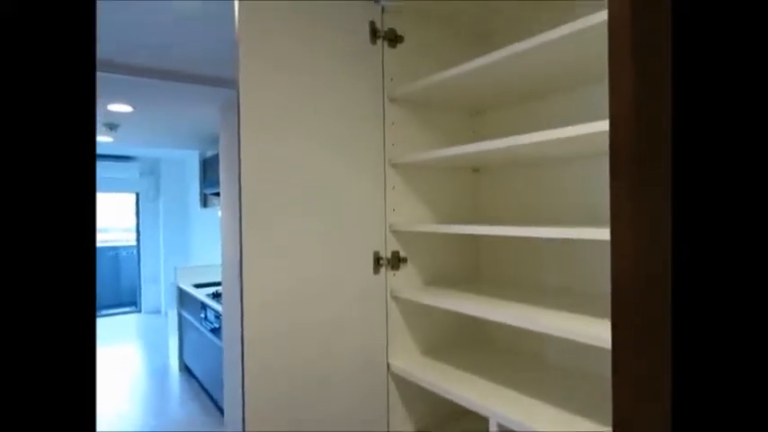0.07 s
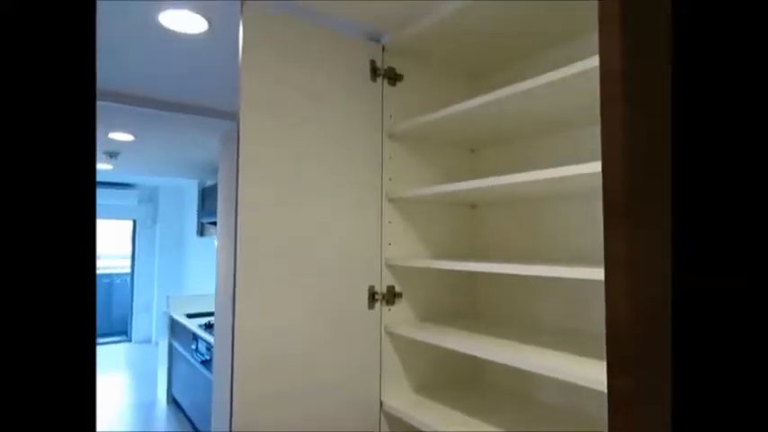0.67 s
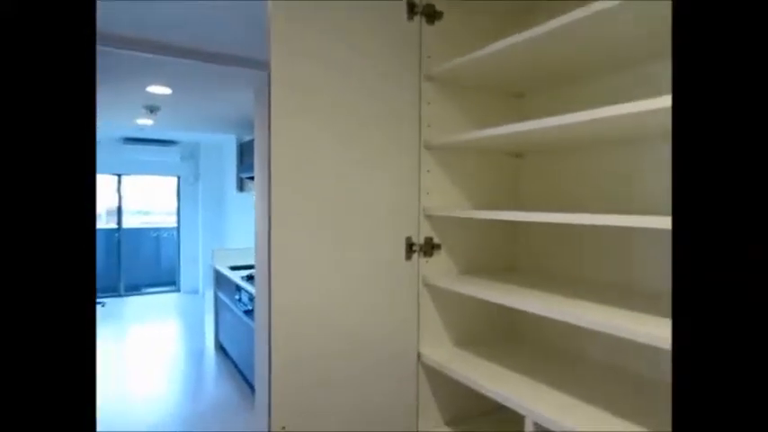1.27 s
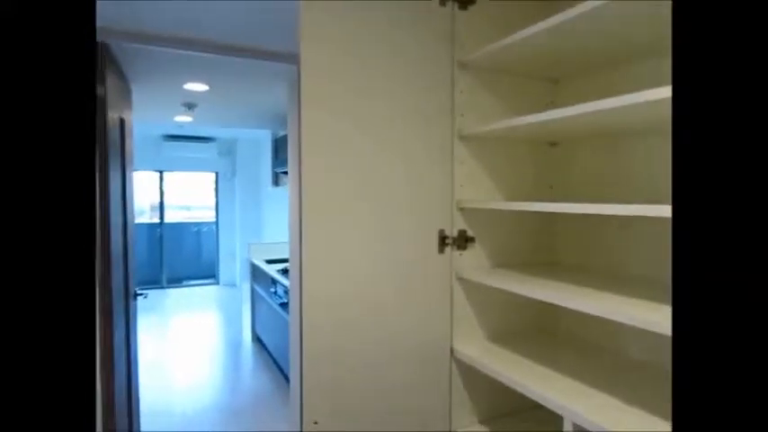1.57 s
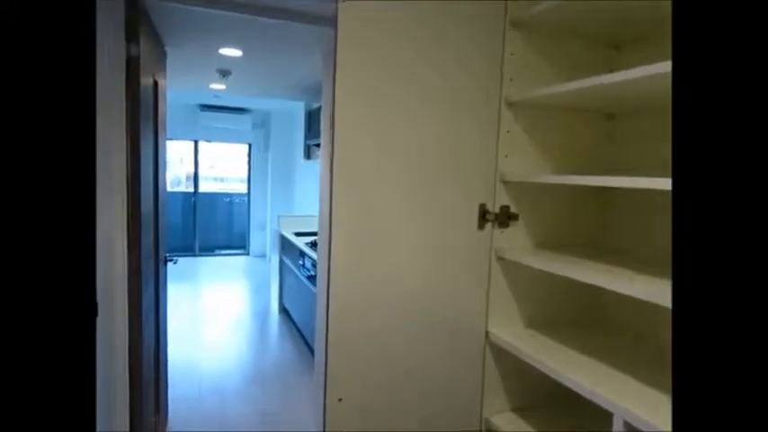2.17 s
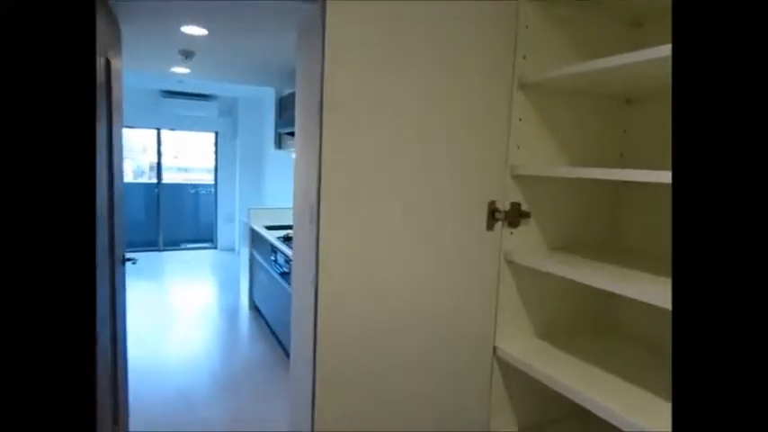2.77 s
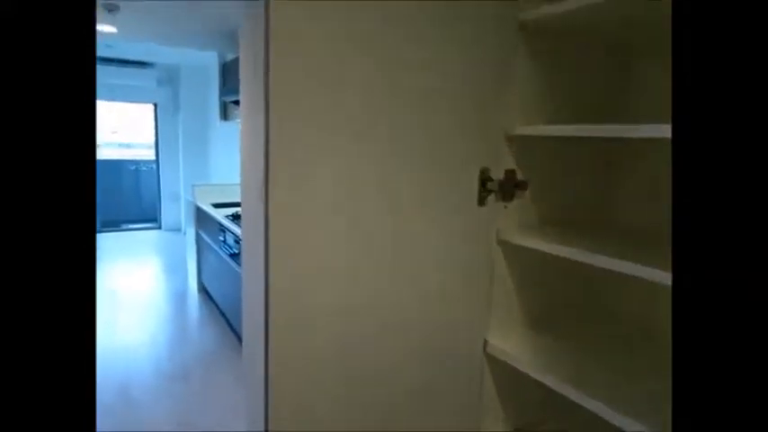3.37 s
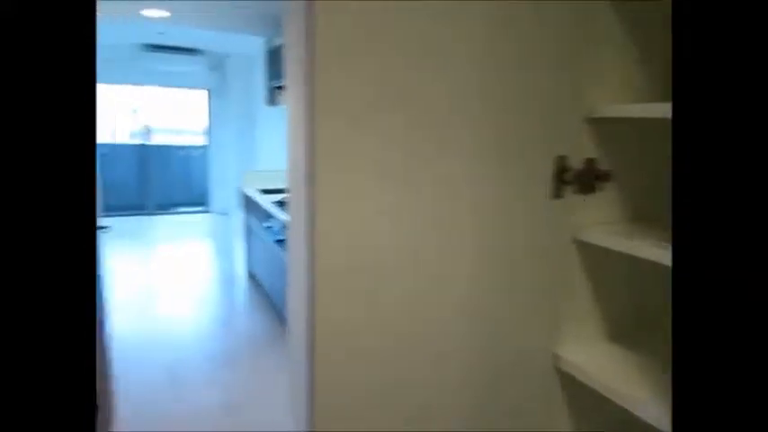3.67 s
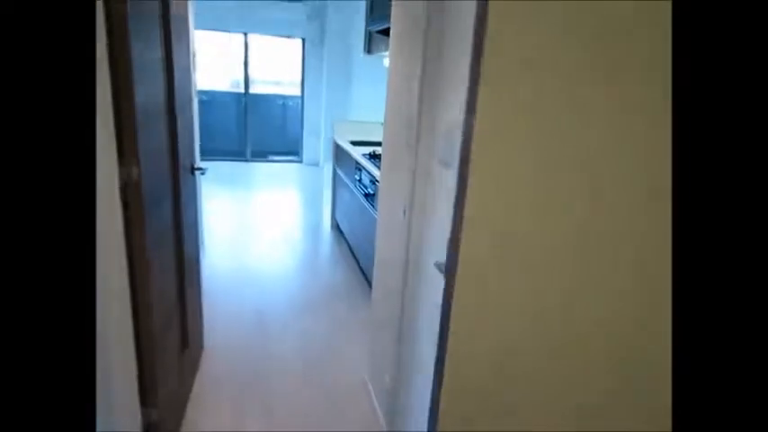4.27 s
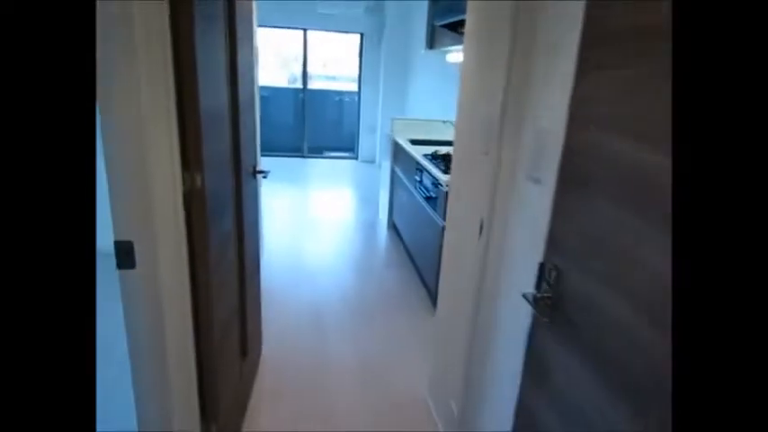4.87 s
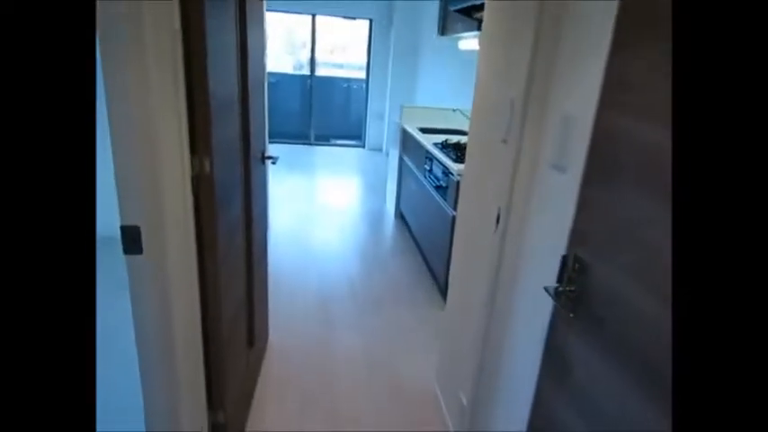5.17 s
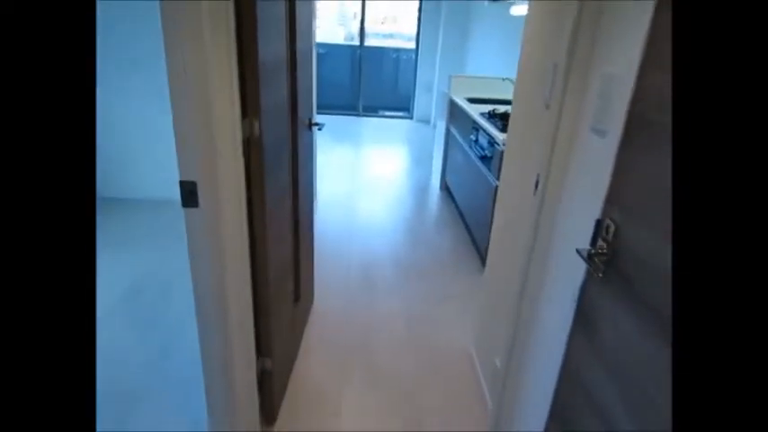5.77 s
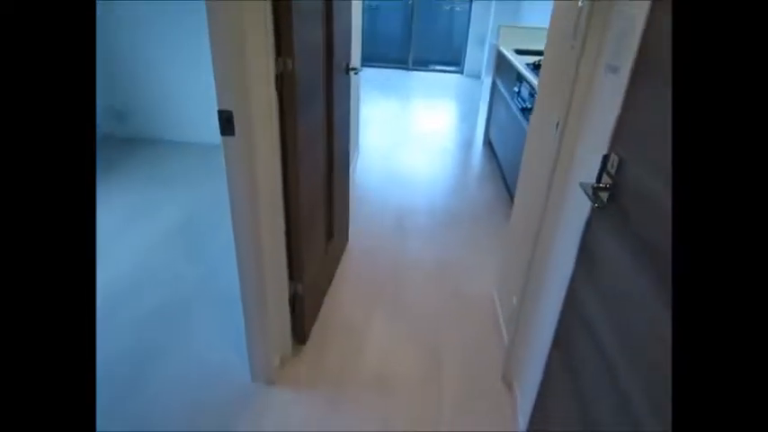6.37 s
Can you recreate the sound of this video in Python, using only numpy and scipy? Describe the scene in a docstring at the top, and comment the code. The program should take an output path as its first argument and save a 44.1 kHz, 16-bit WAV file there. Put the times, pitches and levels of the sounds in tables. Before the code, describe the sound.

Three cabinet doors bang shut close by in a bare room, over soft room noise, an electrical hum and tiny ticks.

```python
"""Built-in cupboard doors, pushed shut three times, close to a hand-held camera in a bare, echoing room.
Each blow thumps, cracks the latch and rings the panel and carcass. The two hard slams overload the
recorder, whose gain control ducks the room and slowly lets it back. Feet shift and fingers tap nearby;
right at the stereo microphones the lens ticks and sleeves rustle. Behind it all lie room tone and a
mains hum that swells and fades as the camera moves through its standing wave."""
import sys
import numpy as np
from scipy import signal
from scipy.fft import rfft, irfft
from scipy.io import wavfile
from scipy.ndimage import uniform_filter1d, minimum_filter1d

SR = 44100
rng = np.random.default_rng(int(sys.argv[2]) if len(sys.argv) > 2 else 0)


def persist_wave(psi):
    """Save psi, clipped to +-1, as 16-bit WAV."""
    counts = np.round(np.clip(psi, -1, 1) * 32767).astype(np.int16)
    wavfile.write(sys.argv[1], SR, np.atleast_2d(counts).T)


N = 292824

# door blows, close by: (time [s], strength [dB], thump pitch [Hz], contact time [s], clatter [dB],
# clatter's high edge [Hz], latch crack [dB])
DOOR_BLOWS = [(2.5531, -10, 756, 0.001, -16.5, 2100, -35), (2.557, -2, 1940, 0.00056, -21.5, 2500, -38),
              (2.5672, -3, 355, 0.0036, -22.5, 2500, -30), (3.153, -18.5, 1950, 0.0026, -33, 2380, -60),
              (4.332, -25.5, 990, 0.0015, -35.5, 2300, -59), (4.6276, -2, 256, 0.00095, 0.5, 2140, -15.5),
              (4.639, 4, 193, 0.0019, -.5, 1200, -22), (4.651, 9, 106.5, 0.0019, -18, 1200, -8),
              (4.755, 0, 76, 0.0099, -14, 1670, -41), (6.5495, 5, 136, 0.00087, -2.5, 1950, -22),
              (6.553, 1, 378, 0.0038, -18.5, 3200, -21), (6.572, 7, 54, .0034, -11, 1300, -23)]
# modes of the door panel: (pitch [Hz], relative level [dB], t60 before the treble cap [s])
PANEL_MODES = [(265, -14, .4), (319.4, 6, 0.36), (362.5, 3, 0.32), (401, -16, 0.19), (479.3, -0.5, 0.29),
               (661, 1, 0.12), (772, -8.5, 0.47), (826, 0, 0.38), (915, -27, 0.099), (1040, -26, 0.13),
               (1285, -30, 0.2), (1512, -6.5, 0.27), (1600, -21, 0.14), (1683, -2.5, 0.12),
               (1856, -9, 0.15), (2012, 3, 0.2), (2200, -19, 0.096), (2400, -37, 0.11), (2530, -26, .12),
               (3000, -27, .11), (3400, -26, .09)]
# modes of the carcass and the air in it: (pitch [Hz], relative level [dB], t60 [s])
CARCASS_MODES = [(55, -20, 0.96), (68.2, -4, 0.5), (86.6, 0.5, 0.17), (121, 1.5, 0.16), (173, -5.5, 0.13),
                 (204.5, -1.5, 0.11), (248, -10, 0.143), (443, -7, 0.061)]
# dense wood resonances: (frequency [Hz], relative density [dB])
WOOD_SPECTRUM = [(40, -7), (200, 4.5), (290, -0.5), (430, 2), (620, -4.5), (950, -4.5), (1400, -7.5),
                 (2200, -6), (3200, -13), (5000, -9), (9000, -6), (16000, 9.5)]
# wood and echo across the microphones: (frequency [Hz], left-right likeness [ratio])
WOOD_LIKENESS = [(60, 1), (400, 0.94), (1200, 0.93), (2500, 0.89), (6000, -0.5), (15000, -1.04)]
# reverberation of the bare room: (frequency [Hz], t60 [s])
ROOM_DECAY = [(50, .8), (150, .8), (400, .85), (850, .92), (1500, .85), (2400, .68), (4000, .5),
              (8000, .34), (16000, .22)]
# soft footfalls nearby: (time [s], level [dB], centre [Hz])
FOOTFALLS = [(2.88, -39, 240), (3.05, -37.5, 141), (4.17, -35.5, 132), (5.92, -30, 70), (5.98, -34.5, 112),
             (6.485, -33.5, 90)]
# light taps on the woodwork: (time [s], level [dB], centre [Hz])
WOOD_TAPS = [(2.039, -40, 1500), (2.89, -42, 340), (4.46, -46, 820), (5.515, -45, 1890)]
# the camera's case in the hand: (time [s], level [dB], centre [Hz])
CASE_CLICKS = [(.298, -28, 580), (.299, -44, 1800), (3.815, -36, 4400)]
# the clearer focus steps of the lens: (time [s], force [dB])
FOCUS_STEPS = [(0.017, -36.5), (.131, -26), (.484, -34), (.531, -27), (.784, -33), (.917, -33.5),
               (1.084, -32), (1.197, -29.5), (1.353, -38), (1.552, -25.5), (2.1, -25), (2.254, -30),
               (3.087, -27), (3.486, -35), (3.553, -38.5), (3.686, -25.5), (3.956, -37.5), (4.054, -31.5),
               (4.198, -34.5), (4.266, -27), (5.654, -38.5), (5.701, -40), (5.77, -27.5), (5.922, -30.5),
               (5.991, -26), (6.056, -30.5), (6.158, -26), (6.423, -34.5)]
# sleeve and grip at the microphones: (middle time [s], length [s], relative level [dB])
SLEEVE_STROKES = [(1.222, 0.027, -43.5), (1.874, 0.034, -46.5), (2.053, 0.028, -46.5), (2.426, 0.029, -47),
                  (3.05, 0.27, -49.5), (3.311, 0.041, -43), (3.804, 0.052, -43.5), (4.216, 0.078, -47.5),
                  (6.28, 0.43, -53.5)]
# brushing cloth: (frequency [Hz], relative density [dB])
CLOTH_SPECTRUM = [(300, -9), (2000, 8), (4500, 4), (8000, -1.5), (13500, 5.5), (16000, -9)]
# mains hum along the camera's path: (time [s], relative level [dB])
HUM_LEVELS = [(0, -38), (.77, -40), (1.23, -35), (1.82, -31.5), (2.23, -23.5), (2.85, -18.5), (3.28, -20.5),
              (3.72, -38), (4.14, -38), (4.55, -33.5), (5.1, -26.5), (5.6, -28), (6.64, -30.5)]
# room tone: (frequency [Hz], relative density [dB])
AIR_SPECTRUM = [(100, 2), (170, 2.5), (205, 2.5), (226, 0), (263, 3), (377, -0.5), (666, -3), (1130, -4.5),
                (1960, -9.5), (3150, -10.5), (3960, -13), (12800, -23), (15800, -27)]
# air, cloth and lens rattle across the microphones: (frequency [Hz], left-right likeness [ratio])
AIR_LIKENESS = [(60, 0.88), (300, -0.55), (1200, 0.18), (3000, 0.51), (7000, 0.22), (15000, -0.18)]
# drift of the room tone's treble: (time [s], gain [dB])
TREBLE_DRIFT = [(0, 1), (.75, 0.4), (1.4, 3), (4.5, 2.5), (5.5, -0.5), (6.1, 2.5)]
# rumble under the room tone: (frequency [Hz], relative density [dB])
RUMBLE_SPECTRUM = [(15, -44), (38, -3), (65, 8), (130, 12), (200, -29), (300, -54)]


def doors(panel_db=-22.5, boom_db=-7, boom_rise_s=0.0067, crack_t60=0.008, crack_hz=5500):
    """Close by, each blow thumps, cracks the latch, clatters, rings the panel and booms in the carcass."""
    near, to_room, t = np.zeros((2, N)), np.zeros((2, N)), np.arange(SR // 2) / SR
    for s, db, thump_hz, contact_s, clatter_db, high_hz, crack_db in DOOR_BLOWS:
        stiffness = thump_hz / 300  # a stiff spot thumps higher and drives the panel more
        panel_gain = amp(db + panel_db + 3.5 * np.log2(stiffness))
        boom_gain = amp(db + boom_db) * bell(thump_hz, centre_hz=122, octaves=0.9)  # the carcass's range
        clatter_t60 = 0.11 * (contact_s / 0.00075) ** 0.59  # a slower contact clatters longer
        # a light touch drives no bass, a padded one no treble
        low_hz = 0.68 * thump_hz
        force = lambda hz: hz ** 2 / (hz ** 2 + low_hz ** 2) / np.hypot(1, (hz / high_hz) ** 2)
        clatter = noise(len(t), lambda hz: amp(read(WOOD_SPECTRUM, hz)) * force(hz), WOOD_LIKENESS)
        clatter *= amp(clatter_db - 60 * t / clatter_t60)
        panel = panel_gain * ring(PANEL_MODES, t, force, spread=0.4, split=0.019) * rise(t, 0.00094)
        boom = boom_gain * ring(CARCASS_MODES, t, np.ones_like, spread=0.78, split=0.07)
        boom *= rise(t, boom_rise_s)
        crack = noise(len(t), lambda hz: 1 / np.hypot(1, (hz / crack_hz) ** 3), WOOD_LIKENESS)
        crack *= amp(crack_db - 60 * t / crack_t60)
        contact = rise(t, contact_s)
        blow = (clatter + panel + boom) * contact + crack
        push = amp(db) * thump(t, thump_hz) * contact
        add(near, s, blow + push)
        add(to_room, s, amp(-2.83) * blow + amp(-4.5) * push)  # the thump is mostly air pushed close by
    low_cut = signal.butter(2, 38, "high", fs=SR, output="sos")  # trims the blows' rumble below 38 Hz
    return signal.sosfilt(low_cut, near + room(to_room))


def thump(t, hz, cycles=9):
    """The struck spot flexes until its motion spreads through the door, 60 dB down after `cycles`."""
    return -np.sin(2 * np.pi * hz * t) * amp(-60 * hz * t / cycles)


def ring(modes, t, colour, spread, split, count=3):
    """Each mode is a cluster of partials that beat as they die, a little apart in phase left and right."""
    hz, db, t60 = np.repeat(modes, count, axis=0).T[:, :, None]
    detune, skew, phase = rng.uniform(-0.94, 1, (3, len(hz), 1))
    t60 = np.minimum(t60, 0.6 * (820 / hz) ** 1.4)  # treble cap: high modes die soon
    envelope = colour(hz) * amp(db - 60 * t / t60) / np.sqrt(count)
    start = phase * np.minimum(hz / 280, np.pi)  # the low modes start in step
    turn = 2 * np.pi * hz * (1 + split * detune) * t + start
    mic_phase = skew * spread * hz / 1000
    return np.array([-(envelope * np.sin(turn + side * mic_phase)).sum(0) for side in (-1, 1)])


def room(x, build_s=0.0034):
    """Bare walls all round: dense reflections build up, then die at their own speed in each band."""
    hz, t, spectra = signal.stft(rng.standard_normal((2, SR)), SR, nperseg=512)
    spectra = pair(spectra.transpose(0, 2, 1), hz, WOOD_LIKENESS)
    spectra *= amp(-60 * t[:, None] / read(ROOM_DECAY, hz))
    tail = signal.istft(spectra.transpose(0, 2, 1), SR, nperseg=512)[1][:, :SR]
    tail *= 1 - np.exp(-(np.arange(SR) / SR / build_s) ** 2)
    tail /= np.sqrt(np.mean(abs(rfft(tail)[:, 200:2000]) ** 2))  # unit gain over 200-2000 Hz
    return signal.fftconvolve(x, tail, axes=1)[:, :N]


def movements():
    """Feet land softly, fingers tap the woodwork, and the case clicks right at the microphones."""
    return (knocks(FOOTFALLS, octaves=0.79, rise_s=0.012, t60=0.28, room_db=0)
            + knocks(WOOD_TAPS, octaves=0.88, rise_s=0.0044, t60=0.21, room_db=-2.5)
            + knocks(CASE_CLICKS, octaves=0.43, rise_s=0.00047, t60=0.036, room_db=-26))


def knocks(rows, octaves, rise_s, t60, room_db):
    """Light knocks: short bands of noise, heard direct and off the walls."""
    near, t = np.zeros((2, N)), np.arange(SR // 2) / SR
    for s, db, centre_hz in rows:
        band = noise(len(t), lambda hz: bell(hz, centre_hz, octaves), WOOD_LIKENESS)
        envelope = np.minimum(t / rise_s, 1) * amp(db - 60 * np.maximum(t - rise_s, 0) / t60)
        add(near, s, band * envelope)
    return near + amp(room_db) * room(near)


def lens(step_hz=1120, burst_s=0.004, case_hz=1260, stop_db=-32.5, lead_s=0.00049, faint_per_s=1.5):
    """Beside the microphones, each focus step buzzes for a few cycles and the case rings on briefly."""
    ticks, t = np.zeros((2, N)), np.arange(1000) / SR
    burst = np.sin(np.pi * np.minimum(t / burst_s, 1)) ** 1.95
    case = amp(-9.5 - 60 * t / 0.036) * np.sin(2 * np.pi * case_hz * t) * rise(t, 0.0011)
    faint_times = np.flatnonzero(rng.random(N) < faint_per_s / SR) / SR
    faint_steps = [(s, rng.normal(-48, 0.5)) for s in faint_times]
    for s, db in FOCUS_STEPS + faint_steps:
        detune, phase = rng.standard_normal(2)
        turn = 2 * np.pi * step_hz * (1 + 0.025 * detune) * t
        buzz = burst * np.sin(turn) + case
        edge = burst * (np.sin(3 * turn) + amp(-11.5) * np.sin(2 * np.pi * 5050 * t + phase))
        rattle = noise(len(t), lambda hz: 1 / np.hypot(1, (hz - 3200) / 1600) ** 3, AIR_LIKENESS)
        rattle *= amp(0.5 - 60 * t / 0.018)
        # past stop_db the lens meets its stop: the buzz hardly grows, the edge does
        buzz_gain = amp(7 + min(db, stop_db) + 0.37 * max(db - stop_db, 0))
        edge_gain = amp(-44 + 2 * (db - stop_db))
        add(ticks, s - lead_s, buzz_gain * buzz + edge_gain * (edge + rattle))
    return ticks * amp([[1.5], [-2.5]])  # louder on the left


def rustles(gain_db=1):
    """Cloth and fingers brush close to the microphones, catching and slipping."""
    t = np.arange(N) / SR
    strokes = sum(amp(db) * np.exp(-2 * ((t - s) / length) ** 2) for s, length, db in SLEEVE_STROKES)
    slip_db = 2 * unit_rms(uniform_filter1d(rng.standard_normal(N), size=300))
    cloth = noise(N, lambda hz: amp(read(CLOTH_SPECTRUM, hz)), AIR_LIKENESS)
    return amp(gain_db) * strokes * unit_rms(amp(slip_db)) * cloth


def mains_hum(hz=100.04, gain_db=3.5, mid_db=-30):
    """One clean mains tone, louder and more lopsided near the bellies of its standing wave."""
    t = np.arange(N) / SR
    db = np.interp(t, *np.transpose(HUM_LEVELS))
    pan_db = 3.5 + 0.18 * (db - mid_db)  # loud spots favour the left microphone
    lag_rad = 0.94 + 0.05 * (db - mid_db)  # and widen the phase gap
    side = np.array([[0.5], [-0.5]])
    return amp(gain_db + db + side * pan_db) * np.sin(2 * np.pi * hz * t - side * lag_rad)


def room_tone(tone_db=-42.5, rumble_db=-53):
    """The room's air in the background, over a faint rumble; its treble drifts slowly."""
    colour = lambda hz: amp(read(AIR_SPECTRUM, hz) - 3.6 * read(AIR_LIKENESS, hz))
    tone = amp(tone_db) * noise(N, colour, AIR_LIKENESS)
    treble = signal.sosfiltfilt(signal.butter(1, 4000, "high", fs=SR, output="sos"), tone)
    drift = amp(np.interp(np.arange(N) / SR, *np.transpose(TREBLE_DRIFT)))
    rumble = amp(rumble_db) * noise(N, lambda hz: amp(read(RUMBLE_SPECTRUM, hz)), AIR_LIKENESS)
    return tone + (drift - 1) * treble + rumble


def noise(size, colour, likeness):
    """Stereo noise of rms 1, shaped by the gain colour(hz)."""
    hz = np.fft.rfftfreq(size, 1 / SR)
    white = rfft(rng.standard_normal((2, size)))
    return unit_rms(irfft(pair(white, hz, likeness) * colour(hz), size))


def pair(spectra, hz, likeness):
    """Turns two unrelated spectra into left and right of a given likeness."""
    same = np.clip(read(likeness, hz), -0.999, 0.999)
    mid, side = spectra[0] * np.sqrt((1 + same) / 2), spectra[1] * np.sqrt((1 - same) / 2)
    return np.array([mid + side, mid - side])


def amp(db):
    """Decibels to gain."""
    return 10 ** (np.asarray(db) / 20)


def unit_rms(x):
    """Scales to rms 1."""
    return x / np.sqrt(np.mean(x ** 2) + 1e-20)


def rise(t, rise_s):
    """An onset that eases up to 1."""
    return 1 - np.exp(-t / rise_s)


def bell(hz, centre_hz, octaves):
    """A bell-shaped gain along log frequency."""
    return np.exp(-0.5 * (np.log2((hz + 1) / centre_hz) / octaves) ** 2)


def read(points, hz):
    """Reads a table along log frequency."""
    table_hz, value = np.transpose(points)
    return np.interp(np.log(hz + 1), np.log(table_hz + 1), value)


def add(mix, s, sound):
    """Mixes a sound in at time s."""
    part = mix[:, max(round(s * SR), 0):][:, :sound.shape[-1]]
    part += sound[..., :part.shape[1]]


def scene():
    """Everything that reaches the microphones."""
    return doors() + movements() + rustles() + mains_hum() + room_tone() + lens()


def record(dry, limit_db=-10, recover_db_per_s=23, attack_s=0.0044, hold_s=0.22, top_hz=15850):
    """The camera's gain control drops fast, holds and creeps back; peaks round off; the top is cut."""
    power_db = 10 * np.log10(abs(uniform_filter1d((dry ** 2).mean(0), size=260)) + 1e-12)
    over_db = np.maximum(power_db - limit_db, 0)
    half_hold = int(hold_s * SR / 2)
    held_db = -minimum_filter1d(-over_db, size=2 * half_hold + 1, origin=half_hold, mode="constant")
    recovery_db = np.arange(N) / SR * recover_db_per_s
    duck_db = np.maximum.accumulate(held_db + recovery_db) - recovery_db
    pole = np.exp(-1 / (attack_s * SR))
    ducked = dry / amp(signal.lfilter([1 - pole], [1, -pole], duck_db))
    rounded = ducked / (1 + ducked ** 6) ** (1 / 6)
    low_pass = signal.firwin(1023, top_hz, window=("kaiser", 9), fs=SR)
    return signal.oaconvolve(rounded, low_pass[None], "same", axes=1)


dry = scene()
out = record(dry)
persist_wave(out)
```